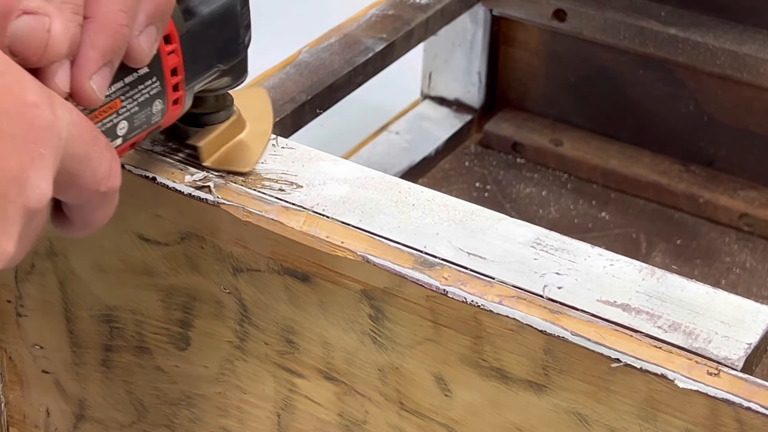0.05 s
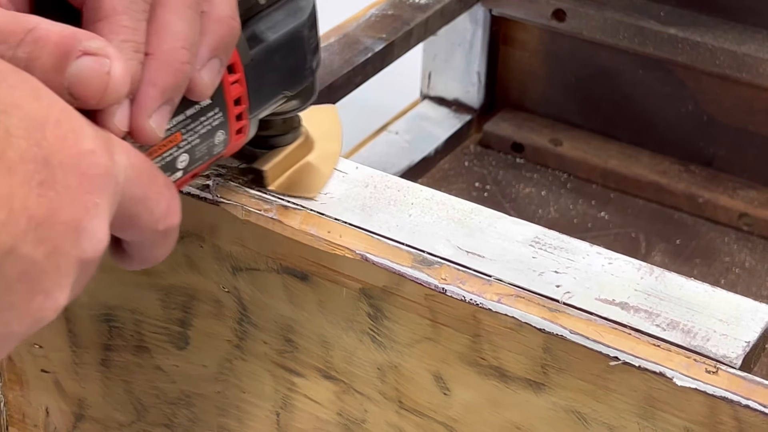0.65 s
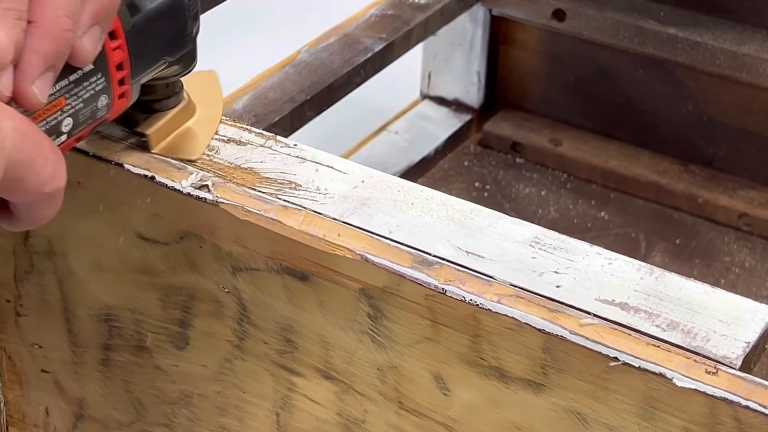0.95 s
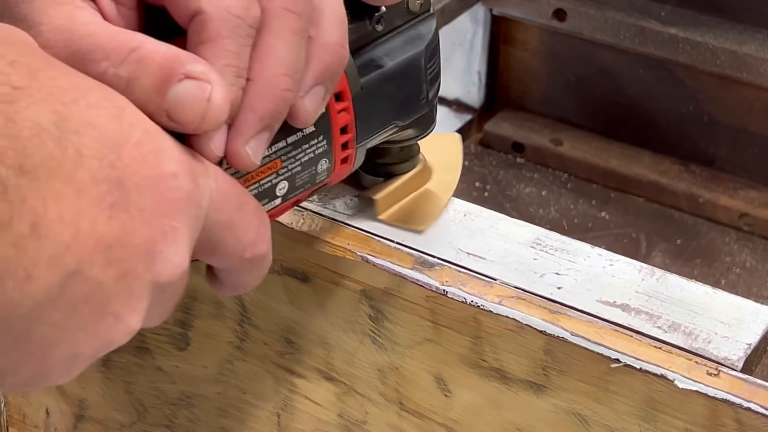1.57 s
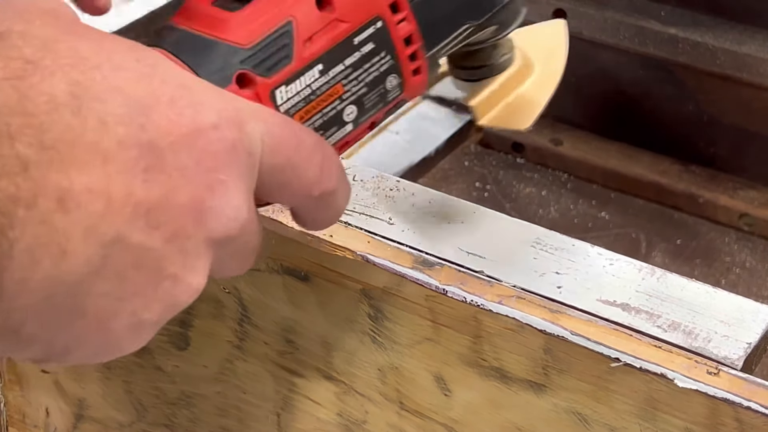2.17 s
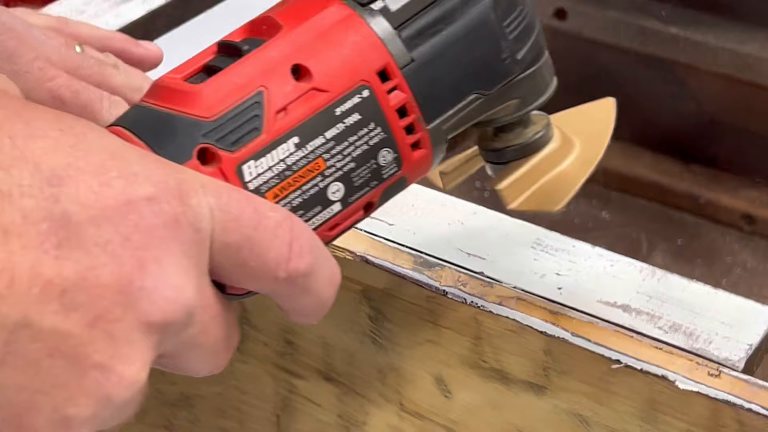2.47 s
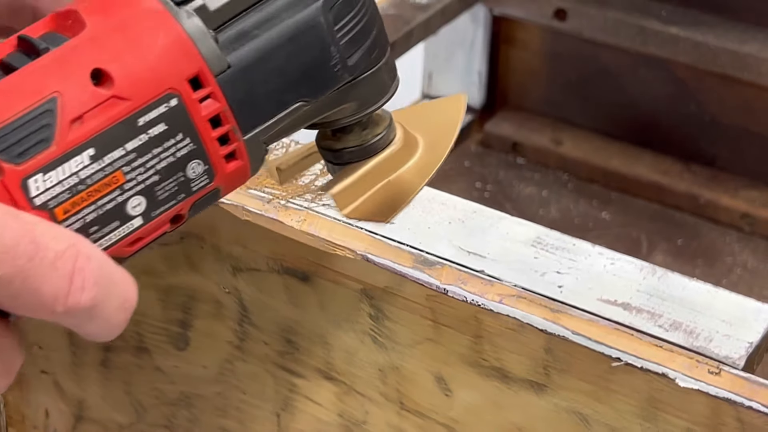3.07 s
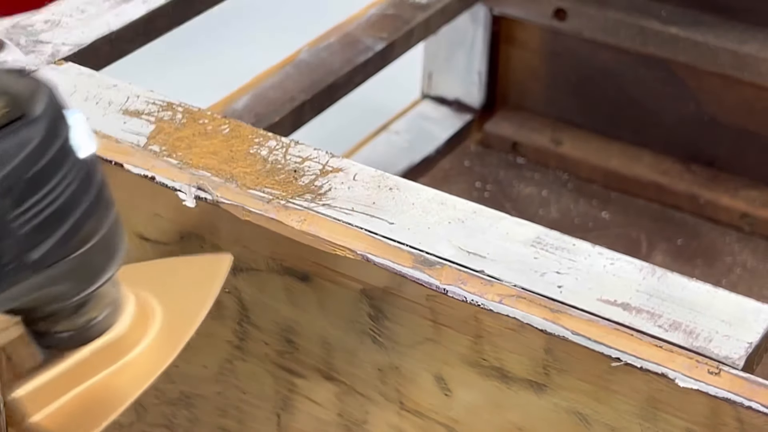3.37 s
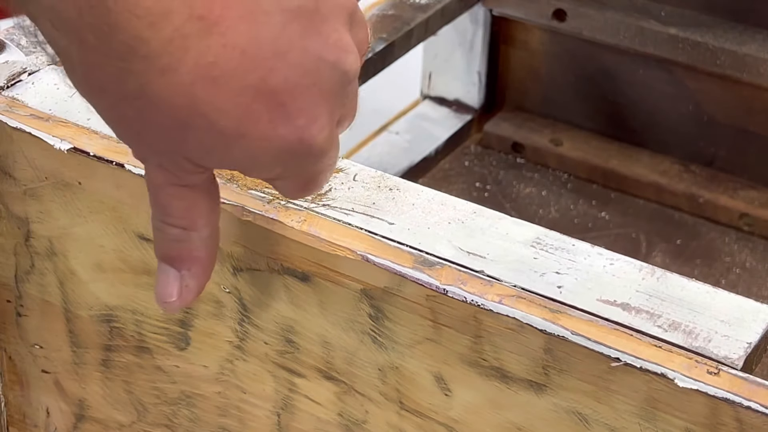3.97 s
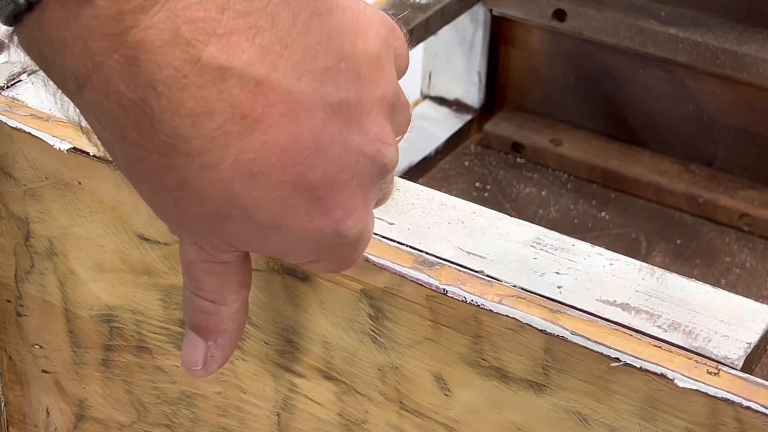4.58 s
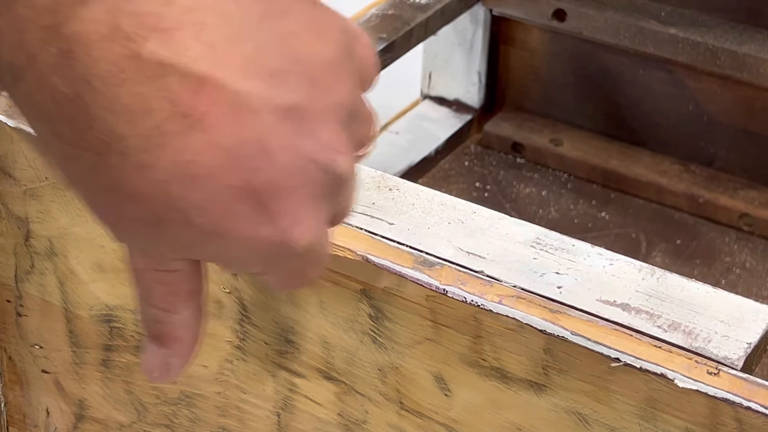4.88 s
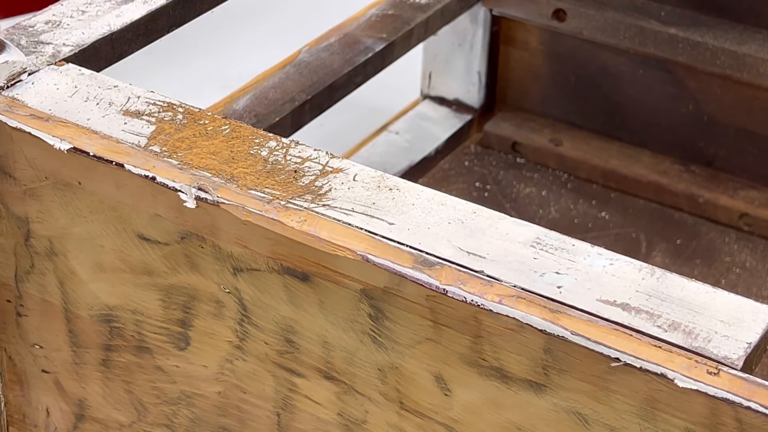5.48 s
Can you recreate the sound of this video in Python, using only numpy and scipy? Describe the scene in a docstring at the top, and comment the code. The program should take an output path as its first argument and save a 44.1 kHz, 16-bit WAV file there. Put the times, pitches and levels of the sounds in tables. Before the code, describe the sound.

From the start, an oscillating multi-tool scrapes paint from the edge of a wooden cabinet, heard close up in a small workshop. Its buzz is loud, rough and gritty, holding nearly one pitch while the pad bites, chatters and makes the boards resonate. At about 2 seconds the tool lifts and the scraping ends, leaving a thinner, steady gear whine with rushing fan air and a light rattle. A few soft, dull bumps on the cabinet come between roughly 1.8 and 3 seconds. From about 3.2 seconds the whine shifts in tone and grows more rattly as the tool turns aside. At 4.7 seconds it is switched off: the pitch falls quickly and the drive gives a short run of metallic ticks, coming to rest at about 5 seconds. A faint low room hum and hiss come up for the last half second.

```python
"""An oscillating multi-tool scrapes the painted edge of a wooden cabinet in a small workshop.
0-2 s: the pad grips and shoves the boards, bites, chatters, bounces and tears off paint.
2 s: it lifts; gear whine, fan air and rattle remain, with a few soft bumps on the cabinet.
From 3.15 s the tool turns further aside. At 4.73 s it is switched off and brakes, ticking, to rest.
From 5.18 s a low room hum and faint hiss come up."""
import sys
import numpy as np
from scipy import signal
from scipy.fft import rfft, irfft, next_fast_len
from scipy.io import wavfile

SR = 44100
rng = np.random.default_rng(int(sys.argv[2]) if len(sys.argv) > 2 else 0)


def inscribe(sig):
    """Save sig as 16-bit PCM at rate SR to the path in sys.argv[1].

    A 1-D sig is mono; a 2-D sig holds one channel per row.
    Samples are clipped to [-1, 1] before scaling.
    """
    pcm = np.round(np.clip(np.atleast_2d(sig).T, -1, 1) * 32767)
    wavfile.write(sys.argv[1], SR, pcm.astype(np.int16))


N = 248327
T = np.arange(N) / SR

# Powered speed, sagging under load: time_s, stroke_hz
MOTOR_SPEED = [(0, 288.8), (.08, 287.6), (.22, 288.7), (.36, 287.9), (.54, 289.8), (.63, 287.6),
               (.74, 286.7), (.8, 288.4), (.915, 285), (1.03, 289.1), (1.13, 286.6), (1.21, 287.6),
               (1.31, 286.3), (1.58, 291.5), (1.82, 287.5), (1.88, 290.6), (2.0, 289.4), (2.08, 294.9),
               (3.85, 296.15), (4.72, 296.35)]
# Tool angle, 0 front to 1 aside: time_s, aside
TOOL_POSE = [(3.15, 0.58), (3.3, 0.66), (3.6, 0.68), (3.75, 0.73), (4.1, 0.79), (4.7, 0.82)]
# Stroke harmonics: multiple, pressed_db, free_front_db, free_aside_db
STROKE_HARMONICS = [(1, 14, -1.5, -37), (2, 4, -21.5, -19.5), (3, 1.5, -25.5, -17), (4, -4, -20.5, -21),
                    (5, 2, -24, -11), (6, -6, -6.5, -20.5), (7, -5.5, -24.5, -20), (8, -7, 2.5, -30),
                    (9, -7, -12, -22), (10, -12, -11.5, -28.5), (11, -13, -22.5, -15.5),
                    (12, -11.5, -26, -16), (13, -4, -2, -5), (14, -8.5, -13.5, -18.5), (15, -9, -7, -25.5),
                    (16, -11, -28, -7), (17, -17, -15.5, -16), (18, -10, -14.5, -8), (19, -13, -20.5, -21),
                    (20, -17, -21.5, -19.5), (21, -20, -17, -17), (22, -19.5, -36.5, -25.5),
                    (23, -21, -29, 1), (24, -14, -23, -17.5), (25, -15, -28.5, -5.5), (26, -7.5, -36, 0.5),
                    (27, -14.5, -11, -6), (28, -7.5, -39.5, -3), (29, -10.5, -32.5, -20.5),
                    (30, -13, -37.5, -9.5), (31, -16, -46, -30), (32, -20, -17, -13.5)]
# Harmonic swells and dips as the tool moves: centre_s, length_s, multiple, change_db
HARMONIC_SWELLS = [(0.154, 0.17, 3, 7), (0.165, 0.29, 19, 11), (0.513, 0.16, 3, -6), (.45, .3, 7, 3),
                   (.85, 0.52, 10, 4.5), (.87, 0.16, 25, 14), (1.22, 0.27, 13, 2), (1.55, .36, 8, 3),
                   (1.555, 0.3, 9, 6.5), (1.56, 0.45, 11, 7.5), (1.56, 0.46, 14, 9), (1.55, 0.45, 18, 4.5),
                   (1.58, .36, 27, 9), (2.11, 0.14, 4, 16), (2.098, 0.038, 13, 5.5), (2.14, 0.14, 17, 9.5),
                   (2.162, 0.44, 18, -14), (2.33, 0.82, 8, 5.5), (2.328, 0.084, 25, 11),
                   (2.46, .5, 24, 12.5), (2.845, 0.43, 17, 4.5), (3.07, 0.35, 13, -6.5),
                   (3.037, 0.12, 27, 9), (3.061, 0.23, 16, 6.5), (3.205, 0.78, 3, 7.5), (3.3, 0.3, 13, 3.5),
                   (3.324, 0.27, 6, -16.5), (3.33, 0.35, 17, 8.5), (3.351, 0.52, 8, 12.5),
                   (3.456, 0.82, 23, -16), (3.446, 0.73, 4, 9), (3.526, 0.45, 20, 11.5),
                   (3.56, 0.62, 14, 10.5), (3.6, 0.34, 3, -16.5), (3.697, 0.19, 13, 5.5),
                   (3.7, 0.28, 17, 7), (3.811, 0.42, 26, 6), (3.888, .5, 5, 4), (4.08, 0.65, 18, 3.5)]
# Cabinet resonances: centre_hz, width_hz, gain_db
BOARD_MODES = [(154, 8.5, -11.5), (260, 1.9, 20), (287, 25, 11), (427, 69, -5), (557, 44, -0.5),
               (844, 41, 3), (1090, 160, -9.5)]
# Pad shoves the boards: start_s, length_s, stroke_db, octave_db
PAD_GRIPS = [(0, 0.3, -31, -44.5), (.035, 0.023, -34.5, -51.5), (.09, 0.18, -38, -52.5),
             (.2, 0.065, -37.5, -47), (.29, 0.19, -31.5, -44), (.44, 0.043, -34, -54.5),
             (.49, 0.098, -34, -66), (.585, .18, -44, -56), (.815, 0.14, -30, -57.5),
             (.93, 0.073, -40, -50.5), (1.035, 0.16, -35, -60), (1.125, .03, -38, -60),
             (1.24, 0.016, -38, -50), (1.39, 0.29, -35, -72), (1.7, .035, -41, -60),
             (1.835, 0.23, -41, -59.5), (1.845, 0.055, -34.5, -53), (1.935, 0.08, -35.5, -49)]
# Edge bites and buzzes: start_s, length_s, level_db, contact_hz
PAD_BITES = [(0.012, 0.27, -44.5, 790), (0.645, 0.097, -41, 865), (0.731, 0.084, -40, 1210),
             (0.81, 0.17, -42, 900), (0.951, 0.1, -37, 1190), (1.064, 0.11, -49.5, 1160),
             (1.8, 0.028, -46.5, 880), (1.937, 0.051, -47, 1400)]
# Pad skips: start_s, length_s, level_db
PAD_CHATTERS = [(.035, 0.049, -42), (.19, 0.065, -44.5), (.38, 0.059, -52), (.61, 0.27, -57),
                (1.195, 0.058, -44), (1.28, 0.11, -51.5), (1.76, 0.2, -55.5), (1.93, 0.11, -50.5)]
# Pad bounces every second stroke: start_s, length_s, level_db
PAD_BOUNCES = [(.13, 0.056, -58.5), (.39, 0.03, -70), (.65, 0.13, -55), (.86, 0.12, -55),
               (1.22, 0.057, -51.5), (1.97, 0.079, -42.5)]
# Edge rubs bare wood: start_s, length_s, level_db
PAD_SIZZLES = [(.02, 0.6, -57), (1.41, 0.25, -58)]
# Base level of pad harmonics and grit: time_s, level_db
SCRAPE_TREBLE = [(0.0, -44), (0.15, -45.5), (0.25, -44.5), (0.4, -44.5), (1.88, -47), (2.0, -47.5)]
# Paint grit: freq_hz, gain_db
GRIT_SPECTRUM = [(200, -24.5), (400, -8.5), (900, 0), (1500, 0), (2500, 2), (3400, -2), (4500, 0),
                 (5400, -4), (6400, -8), (8100, 0), (9200, -8), (9900, -32), (11200, -12.5), (13000, -26.5),
                 (15500, -15)]
# Highest harmonics: freq_hz, gain_db
SIZZLE_SPECTRUM = [(9300, -30.5), (9600, 1.5), (10200, -18), (11000, 2.5), (12500, -2), (13600, -17.5),
                   (14300, 0), (15400, 8.5)]
# Soft knocks on the cabinet: start_s, level_db
CABINET_BUMPS = [(1.83, -51), (2.031, -42), (2.6, -51), (2.666, -49.5), (2.878, -59), (3.01, -59)]
# Fan air: freq_hz, gain_db
AIR_SPECTRUM = [(100, -20), (300, -6.5), (600, -2), (1200, -1), (1600, 2.5), (2000, -3.5), (2600, 5),
                (3500, -4), (4500, 3.5), (5900, -0.5), (8000, -14.5), (9400, -30.5), (11000, -17.5),
                (15500, -19.5)]
# Drive rattle: freq_hz, gain_db
RATTLE_SPECTRUM = [(500, -43.5), (2000, -5), (4000, -4.5), (5400, -4.5), (6200, -7.5), (7100, -0.5),
                   (8300, -2), (9400, -6), (10300, -33), (12000, -14.5), (14000, -23), (15400, -8.5)]
# Last knocks of the drive: start_s, peak_db
STOP_TICKS = [(4.819, -41), (4.844, -40), (4.856, -41), (4.884, -46), (4.9, -47), (4.921, -54),
              (4.928, -49.5), (4.9444, -53), (4.953, -52.5), (4.966, -57), (4.978, -68), (5.015, -66)]
# Steel head and blade: pitch_hz, gain_db, t60_s
STEEL_MODES = [(1096, -8, 0.05), (2030, -8, 0.02), (2760, -17, .02), (5400, -4, 0.028), (6900, 4, 0.038),
               (7800, 4, 0.015), (8400, -10, 0.023)]
# Room hum: freq_hz, gain_db
HUM_SPECTRUM = [(25, -29.5), (50, -11), (74, 0.5), (100, -15), (200, -23), (300, -23.5), (450, -24.5),
                (900, -41.5), (2000, -73)]
# Room hiss: freq_hz, gain_db
HISS_SPECTRUM = [(300, -5), (900, 0), (2500, -0.5), (5000, -4), (8000, -13), (12000, -19)]
# Left-right difference of the room tail: freq_hz, gain_db
TAIL_SIDE_SPECTRUM = [(150, -17), (290, -26), (600, -12), (1500, -1.5), (4000, -51), (8000, -47)]
# Phase between channels: freq_hz, left_lead_rad
STEREO_PHASE = [(250, 0), (700, -.3), (1300, -.55), (2000, -.3), (3200, .5), (3900, .12), (5000, .1),
                (7500, 0), (8600, -.35), (9600, -2.2), (15000, -2)]

LIFT_S, LIFT_TIME_S, BOARDS_T60_S = 2.0, 0.088, 0.45
OFF_S, UNLOAD_S, BRAKE_GRAB_S, BRAKE_DECAY_S, FRICTION_HZ = 4.731, 0.026, 0.0119, 0.24, 63.4
SLIDE_BUZZ_DB, SLIDE_CONTACT_HZ = -47, 1057
WHINE_EXPONENT, AIR_EXPONENT, RATTLE_EXPONENT = 3.8, 1.94, 3.16  # amplitude vs. speed
GEAR_MULTIPLE, SHELL_FRONT_HZ, TOP_HZ = 13, 2310, 15750


def undb(db):
    """Decibels to gain."""
    return np.exp(np.asarray(db) * (np.log(10) / 20))


def unit(x):
    """Scale to rms 1."""
    return x / np.sqrt(np.mean(x ** 2))


def curve(points):
    """(time_s, value) points, joined per sample."""
    return np.interp(T, *np.transpose(points))


def ramp(start_s, rise_s):
    """Linear rise, 0-1."""
    return np.clip((T - start_s) / rise_s, 0, 1)


def gate(start_s, length_s, edge_s):
    """Attack, hold, release, 0-1."""
    return ramp(start_s - edge_s / 2, edge_s) - ramp(start_s + length_s - edge_s / 2, edge_s)


def envelope(events, edge_s, floor_db, column=2):
    """Gain of gated events over a steady floor."""
    return undb(floor_db) + sum(undb(row[column]) * gate(row[0], row[1], edge_s) for row in events)


def over_bins(points, size):
    """(freq_hz, value) points, joined in log frequency per FFT bin."""
    hz, value = np.transpose(points)
    return np.interp(np.log(np.arange(size // 2 + 1) * SR / size + 1), np.log(hz), value)


def colour(x, spectrum):
    """Filter by a spectrum; rms 1."""
    size = next_fast_len(N)
    return unit(irfft(rfft(x, size) * undb(over_bins(spectrum, size)), size)[:N])


def noise():
    """White noise."""
    return rng.standard_normal(N)


def walk(rate_hz):
    """Random drift, spread near 1."""
    steps = rng.standard_normal(4096)
    return 1.2 * np.interp(T * rate_hz, np.arange(len(steps)), steps)


def bell(hz, centre_hz, width_hz):
    """Nearness to a resonance, 0-1."""
    return 1 / (1 + (2 * (hz - centre_hz) / width_hz) ** 2)


def resonate(x, centre_hz, width_hz):
    """One resonance, unity peak gain."""
    return signal.lfilter(*signal.iirpeak(centre_hz, centre_hz / width_hz, SR), x)


def ring(x, centre_hz, width_hz, level_db):
    """One resonance, scaled to an rms level."""
    return undb(level_db) * unit(resonate(x, centre_hz, width_hz))


def partial(turns, multiple, scatter=1):
    """Sinusoid, rms 1; scatter is its random phase range in cycles."""
    return np.sqrt(2) * np.cos(2 * np.pi * (multiple * turns + scatter * rng.uniform(-.5, .5)))


def bursts(turns, hz, decay_s, spread_db):
    """One decaying pulse per turn, random strength; rms 1."""
    strength = undb(spread_db * np.clip(rng.standard_normal(4096), -2, 2))
    return unit(np.exp(-(turns % 1) / (hz * decay_s)) * strength[turns.astype(int) % len(strength)])


def swell_db(k):
    """Passing rises and dips of harmonic k."""
    return sum(db * np.cos(np.pi * np.clip((T - centre_s) / length_s, -.5, .5))
               for centre_s, length_s, multiple, db in HARMONIC_SWELLS if round(multiple) == k)


def boards(x):
    """Cabinet resonances; they radiate no deep bass."""
    rung = sum(undb(db) * resonate(x, hz, width_hz) for hz, width_hz, db in BOARD_MODES)
    return signal.sosfilt(signal.butter(4, 135, "high", fs=SR, output="sos"), rung)


def grip(slip):
    """The pad shoves the boards once a stroke: low tone and octave."""
    stroke = envelope(PAD_GRIPS, edge_s=0.016, floor_db=-47.5)
    octave = envelope(PAD_GRIPS, edge_s=0.016, floor_db=-45.5, column=3)
    waver = undb(1.3 * walk(45))
    return waver * (stroke * partial(slip, 0.99, scatter=0) + octave * partial(slip, 2, scatter=0.36))


def buzz(turns, slip, bite_db, treble_db):
    """Harmonics 3-5 come from the wood contact, higher ones from the pad; hard bites ring the blade."""
    bite = undb(SLIDE_BUZZ_DB + bite_db)
    pull = sum((hz - SLIDE_CONTACT_HZ) * undb(db) * gate(start_s, length_s, edge_s=0.012)
               for start_s, length_s, db, hz in PAD_BITES)
    contact_hz = SLIDE_CONTACT_HZ + pull / bite
    stroke_hz = shaft_hz()
    wood = [undb(db + 11 * bell(k * stroke_hz, contact_hz, width_hz=260))
            for k, db, _, _ in STROKE_HARMONICS[2:5]]
    wood_scale = bite / np.sqrt(sum(gain ** 2 for gain in wood))
    pad = [undb(db - 1.74 + treble_db + 0.56 * bite_db * bell(k * stroke_hz, 3000, width_hz=900))
           for k, db, _, _ in STROKE_HARMONICS[5:]]
    out = 0
    for k, gain in enumerate([gain * wood_scale for gain in wood] + pad, 3):
        waver_db = min(.55 * k, 2.3) * (walk(14) + walk(60))
        tone = partial(turns if k == GEAR_MULTIPLE else slip, k, scatter=min(k / 12, 1))
        out += gain * undb(waver_db + swell_db(k)) * tone
    return out


def bounce(slip, pressed):
    """The pad bounces every second stroke: half-order tones."""
    gain = envelope(PAD_BOUNCES, edge_s=0.053, floor_db=-66) * undb(0.6 * walk(25))
    return gain * (partial(slip, .5) + 0.53 * partial(slip, 1.5) * np.sqrt(pressed))


def chatter(turns, hz):
    """The skipping pad knocks the boards once a stroke; rms 1."""
    skips = noise() * bursts(turns, hz, decay_s=0.002, spread_db=2.5)
    return unit(signal.sosfilt(signal.butter(2, 1700, fs=SR, output="sos"), boards(skips)))


def grit(turns, hz):
    """Paint grains tear off, pulsing with the stroke; rms 1."""
    return colour(noise() * (1 + .35 * bursts(turns, hz, decay_s=.0011, spread_db=2)), GRIT_SPECTRUM)


def scraping(turns, hz, pressed):
    """Pad on wood: grip, buzz, bounce, chatter and grit, fading at the lift."""
    bite_db = 20 * np.log10(envelope(PAD_BITES, edge_s=0.012, floor_db=SLIDE_BUZZ_DB)) - SLIDE_BUZZ_DB
    skipping = envelope(PAD_CHATTERS, edge_s=0.057, floor_db=-60)
    treble_db = curve(SCRAPE_TREBLE)
    slip = turns + 0.0042 * walk(110)  # uneven grip: strokes land early or late
    wood = (grip(slip) + buzz(turns, slip, bite_db, treble_db)) * pressed
    wood += bounce(slip, pressed)
    wood += chatter(turns, hz) * skipping * undb(10.5) * np.sqrt(pressed)
    ring_out = undb(-60 * np.maximum(T - LIFT_S - LIFT_TIME_S, 0) / BOARDS_T60_S)
    grit_gain = undb(treble_db + 1.84 + 0.03 * (bite_db - 11)) * (skipping / undb(-52)) ** .1
    return wood * ring_out + grit(turns, hz) * grit_gain * pressed


def sizzle(turns, aside, pressed, speed_db, size=2048):
    """Top harmonics, trading strength: rough on bare wood, thin and clean running free."""
    rubbing = pressed * envelope(PAD_SIZZLES, edge_s=0.09, floor_db=-75)
    free = (1 - pressed) * undb(-71.5 + 22 * aside + 2 * WHINE_EXPONENT * speed_db)
    slip = turns + .004 * pressed * walk(200)
    multiples = np.arange(size // 2 + 1)
    top = (multiples > len(STROKE_HARMONICS)) & (multiples * MOTOR_SPEED[0][1] < TOP_HZ)
    wavetables = irfft(top * np.exp(2j * np.pi * rng.random((3, len(multiples)))))
    shares = np.array([walk(7) for _ in wavetables])
    shares /= np.sqrt(np.sum(shares ** 2, axis=0))
    blend = np.sum(wavetables[:, (slip * size).astype(int) % size] * shares, axis=0)
    return colour(blend, SIZZLE_SPECTRUM) * (rubbing + free)


def bumps(t60_s=0.52):
    """Dull pushes on the boards; the lowest mode booms on."""
    out, t = np.zeros(N), T[:SR // 2]
    thud = boards(t * np.exp(-t / 0.0023))
    boom = np.sin(2 * np.pi * BOARD_MODES[0][0] * t) * undb(-60 * t / t60_s) * (1 - np.exp(-t / 0.013))
    for start_s, db in CABINET_BUMPS:
        out[int(start_s * SR):][:len(t)] += undb(db) * (thud / np.abs(thud).max() + 0.4 * boom)
    return out


def whine(turns, aside, speed_db):
    """Harmonics of the free-running drive, beamed by the housing as it turns."""
    level_db = -47.5 + 8 * aside
    unload_db = -12 * ramp(OFF_S, UNLOAD_S)
    out = 0
    for k, _, front_db, aside_db in STROKE_HARMONICS:
        beam_db = (1 - aside) * front_db + aside * aside_db + swell_db(k)
        sway_db = (1.2 + k / 14) * (1 - .4 * aside) * walk(7)
        rasp_db = 3.5 * bell(k * MOTOR_SPEED[-1][1], SHELL_FRONT_HZ, width_hz=600)
        flutter_db = k / 25 * walk(40) + rasp_db * walk(110)
        # Power off: gears unload, high harmonics die first.
        fall_db = unload_db * min(k / GEAR_MULTIPLE, 1) ** 2
        fall_db += WHINE_EXPONENT * speed_db * min(0.64 + 0.028 * k, 1.5)
        # Odd harmonics lead a quarter cycle: a pulse at both stroke ends.
        tone = partial(turns + k % 2 / (4 * k), k, scatter=.72)
        out += undb(level_db + beam_db + sway_db + flutter_db + fall_db) * tone
    return out


def fan_air(turns, hz, aside, speed_db, braking):
    """Pulsing air from the vents; turned aside, they add a hollow rush."""
    pulsing = 1 + .25 * bursts(turns, hz, decay_s=.0009, spread_db=2.5)
    air = colour(noise() * pulsing, AIR_SPECTRUM) * undb(-51 - 4 * aside + 0.5 * braking)
    vent = ring(noise(), 1500, width_hz=600, level_db=-63) * aside ** 2
    return (air + vent) * undb(AIR_EXPONENT * speed_db)


def rattle(turns, hz, aside, speed_db, braking, ticking_hz=85):
    """The drive knocks at both stroke ends and rings the shell; under braking, the steel head too."""
    brake_gain = undb(6.5 * braking)
    knocks = noise() * bursts(2 * turns, 2 * hz, decay_s=0.0011, spread_db=0.5)
    knocks *= np.clip(hz / ticking_hz - 1, 0, 1)
    drive = colour(knocks, RATTLE_SPECTRUM) * undb(-61 + 21.5 * aside) * brake_gain
    hard_knocks = noise() * bursts(turns, hz, decay_s=.0005, spread_db=3)
    front = (1 - aside) * ring(hard_knocks, SHELL_FRONT_HZ, width_hz=220, level_db=-52)
    side = aside * ring(hard_knocks, 2064, width_hz=170, level_db=-55) * brake_gain
    head = braking * ring(knocks, 7120, width_hz=190, level_db=-46.5) * undb(1.1 * speed_db)
    return (drive + front + side) * undb(RATTLE_EXPONENT * speed_db) + head


def groan(turns, hz, centre_hz=370, width_hz=41):
    """The slowing drive sweeps through a housing resonance."""
    shake = (hz / hz.max()) ** 2 * partial(turns, 1.8)
    return undb(-48.5) * resonate(resonate(shake, centre_hz, width_hz), centre_hz, width_hz)


def judder(turns, speed_db, braking):
    """Braking shakes the tool about once a stroke."""
    return braking * undb(-61 + 3.9 * speed_db) * partial(turns, 0.96)


def ticks():
    """The stopping drive knocks through its play and rings the steel head."""
    out, t = np.zeros(N), T[:SR // 8]
    for start_s, peak_db in STOP_TICKS:
        steel = sum(undb(db - 60 * t / t60_s) * np.sin(2 * np.pi * (hz * t + rng.random()))
                    for hz, db, t60_s in STEEL_MODES)
        tick = steel + 0.9 * rng.standard_normal(len(t)) * np.exp(-t / 0.0016)
        out[int(start_s * SR):][:len(t)] += undb(peak_db) * tick / np.abs(tick).max()
    return out


def room_hum(rise_at_s=5.18, hum_hz=73):
    """Low hum and faint hiss, rising after the tool stops."""
    hum_db = -77 + 12 * ramp(rise_at_s, .07)
    hiss_db = -101 + 19 * ramp(rise_at_s, .11)
    hum = 0.68 * colour(noise(), HUM_SPECTRUM) + 0.17 * partial(hum_hz * T, 1)
    side = undb(hum_db - 18.5) * colour(noise(), HUM_SPECTRUM)
    hiss = undb(hiss_db) * colour(noise(), HISS_SPECTRUM)
    return stereo(hum * undb(hum_db) + hiss) + np.array([side, -side])


def room_tail(x, t60_s=0.24, mid_db=-13.5):
    """Short, dull reverberation, different at each ear."""
    t = T[:SR // 3]
    tails = rng.standard_normal((3, len(t))) * undb(-60 * t / t60_s) * (t > .004)
    tails /= np.sqrt(np.sum(tails ** 2, axis=1, keepdims=True))
    mids = signal.sosfilt(signal.butter(2, [700, 3000], "band", fs=SR, output="sos"), tails[:2])
    side = irfft(rfft(tails[2]) * undb(over_bins(TAIL_SIDE_SPECTRUM, len(t))), len(t)) * (t < t60_s)
    return signal.oaconvolve(x[None], undb(mid_db) * mids + np.array([side, -side]), axes=1)[:, :N]


def stereo(x, left_db=-0.1):
    """Two channels, offset in phase and level."""
    size = next_fast_len(N + SR // 10)
    lead = undb(left_db / 2) * np.exp(.5j * over_bins(STEREO_PHASE, size))
    return irfft(rfft(x, size) * np.array([lead, 1 / lead]), size)[:, :N]


def shaft_hz():
    """Stroke rate: powered, then slowed by brake and friction."""
    decay = np.exp(-np.maximum(T - OFF_S, 0) / BRAKE_DECAY_S)
    return np.maximum((curve(MOTOR_SPEED) + FRICTION_HZ) * decay - FRICTION_HZ, 1)


def scene():
    """One shaft times the scraping, whine and rattle."""
    hz = shaft_hz()
    speed_db = 20 * np.log10(hz / curve(MOTOR_SPEED))
    pressed = 1 - ramp(LIFT_S, LIFT_TIME_S)
    aside = curve(TOOL_POSE)
    braking = ramp(OFF_S, BRAKE_GRAB_S)
    brake_waver = 0.022 * braking * walk(300)  # the brake grabs unevenly
    load_waver = (0.00018 + 0.0015 * pressed) * walk(30)
    turns = np.cumsum(hz * (1 + load_waver + brake_waver)) / SR
    turning = np.clip((hz - 30) / 60, 0, 1)  # near rest the drive no longer hits its stops
    free = whine(turns, aside, speed_db) + groan(turns, hz)
    free += fan_air(turns, hz, aside, speed_db, braking)
    free += rattle(turns, hz, aside, speed_db, braking) + judder(turns, speed_db, braking)
    free *= np.sqrt(1 - pressed) * turning
    contact = scraping(turns, hz, pressed) + bumps() + ticks()
    direct = stereo(free + contact + sizzle(turns, aside, pressed, speed_db))
    return direct + room_tail(undb(5) * free + contact) + room_hum()


def record(dry):
    """Steep low-pass at TOP_HZ."""
    return signal.sosfilt(signal.ellip(10, .2, 80, TOP_HZ, fs=SR, output="sos"), dry)


dry = scene()
out = record(dry)
inscribe(out)
```